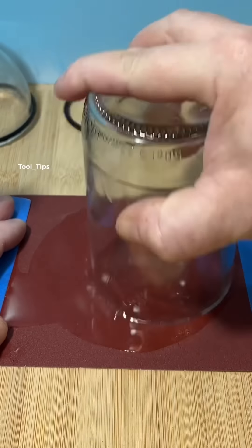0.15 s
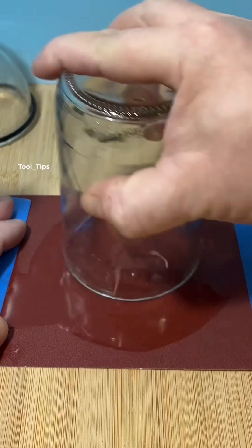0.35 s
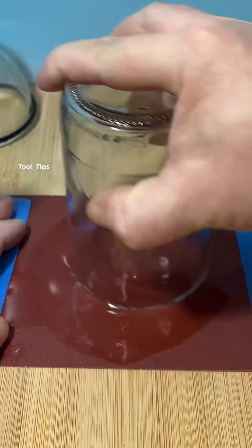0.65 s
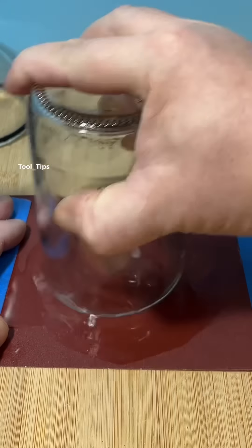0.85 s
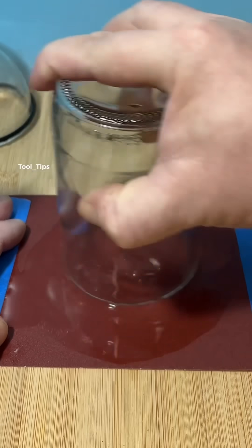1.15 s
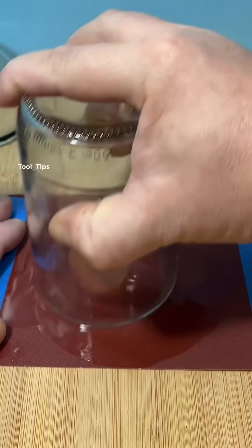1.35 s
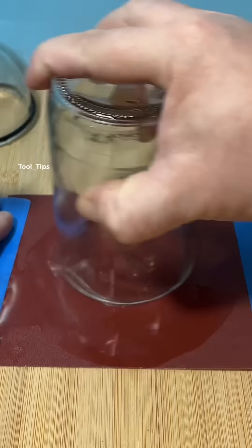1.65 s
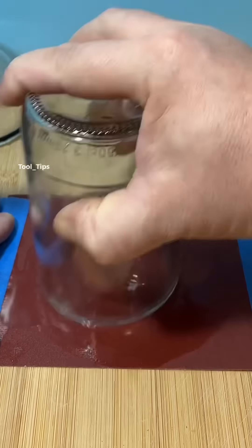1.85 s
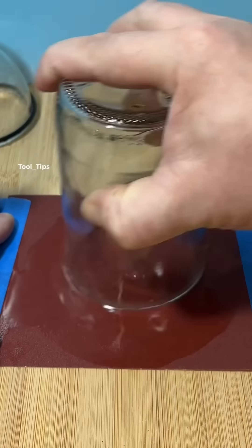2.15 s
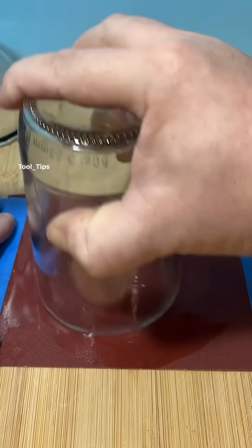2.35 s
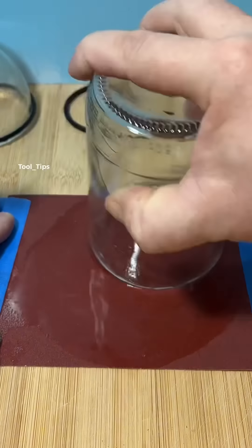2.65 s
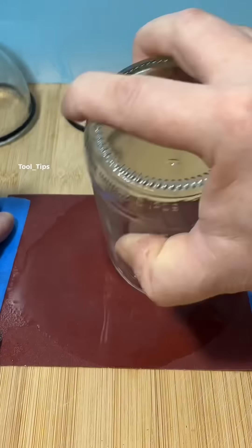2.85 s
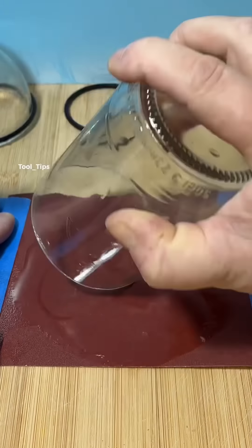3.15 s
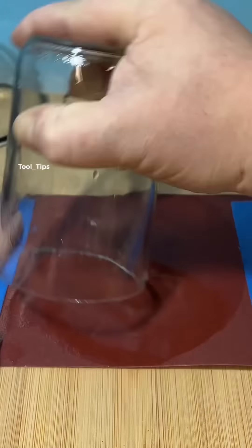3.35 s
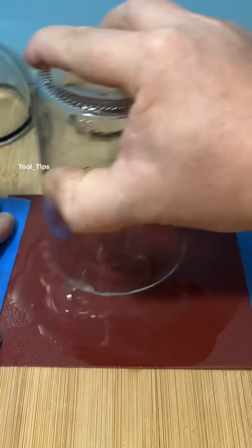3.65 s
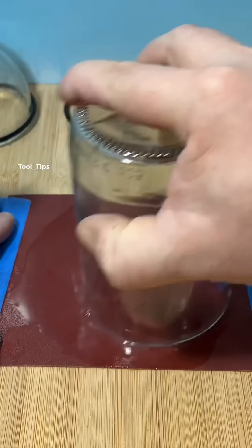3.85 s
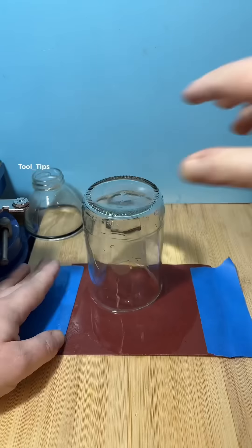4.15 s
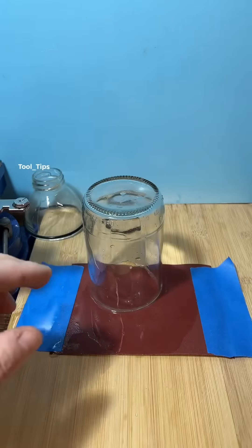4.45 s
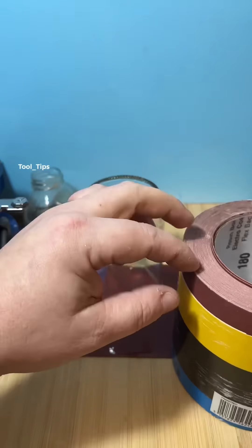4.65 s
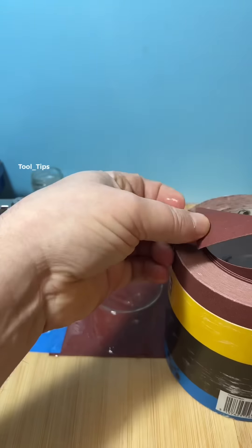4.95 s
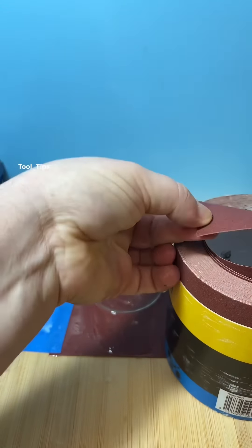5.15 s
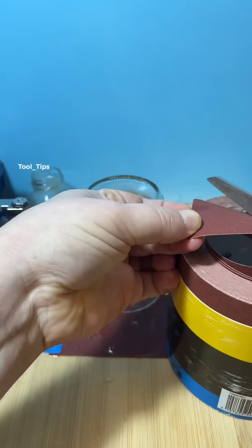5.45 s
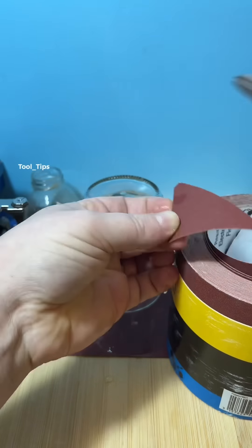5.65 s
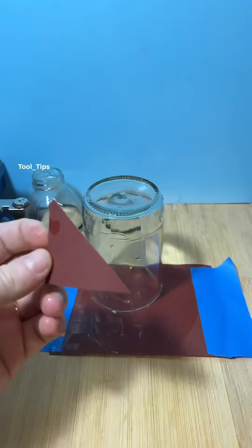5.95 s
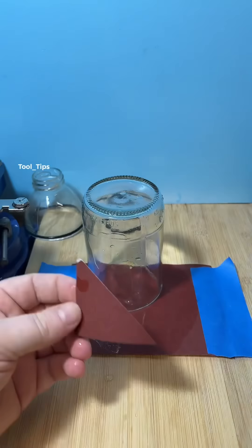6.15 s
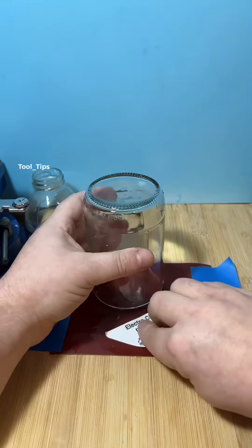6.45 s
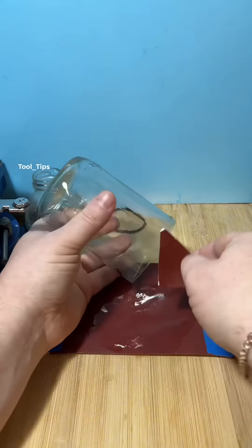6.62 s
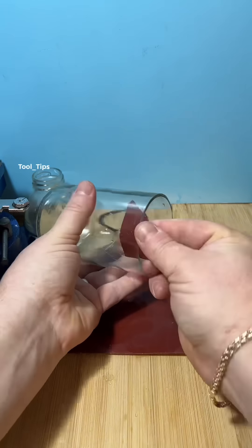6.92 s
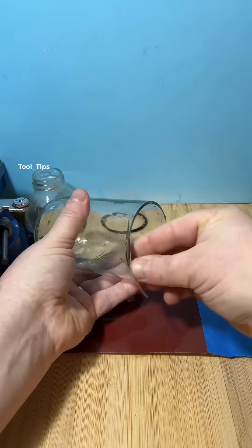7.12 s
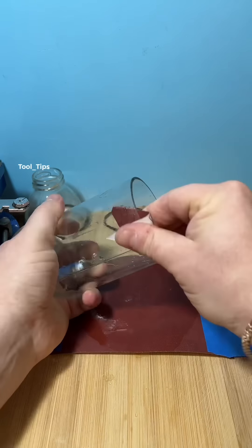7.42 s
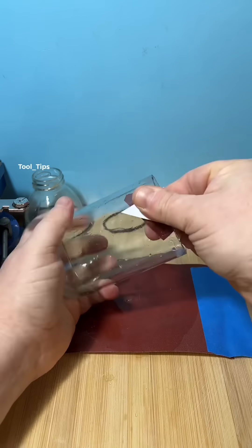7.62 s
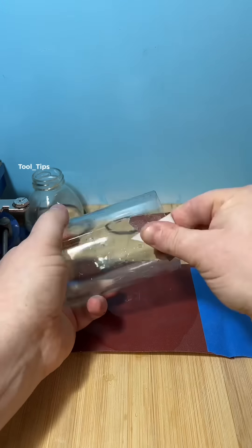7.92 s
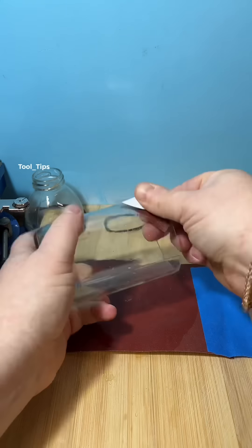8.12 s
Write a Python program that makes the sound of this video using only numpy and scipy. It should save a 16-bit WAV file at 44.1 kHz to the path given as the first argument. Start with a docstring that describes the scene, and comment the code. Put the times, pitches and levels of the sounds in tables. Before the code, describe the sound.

Close up on a wooden bench, an upturned glass jar is ground on abrasive paper in quick, pulsing circles, bright and gritty with a glassy ring. It tilts into longer stuttering scrapes, then knocks and grinds again before stopping. A clunk, paper rustles and a quick metallic scissor cut follow, then quiet, scratchy wiping of a paper scrap along the glass edge. Dry small room, faint hush.

```python
"""Glass ground on abrasive paper

An upturned glass is ground in quick circles on abrasive paper taped to a wooden bench, tilted, and ground again.
Hands then set down a roll, cut and handle a scrap of the paper, and wipe the glass's edge with it in a quiet room.
Grit is clumped, spiky noise; shaped by each contact, it drives resonances of rim, wall, edge and bench.
Knocks, cracks, rustles, blade slips and wiping strokes are timed bursts, over a faint tail and a room hush.
"""
import sys
import numpy as np
from scipy import signal
from scipy.fft import rfft, irfft, next_fast_len
from scipy.io import wavfile
from scipy.ndimage import map_coordinates

SR = 44100
rng = np.random.default_rng(int(sys.argv[2]) if len(sys.argv) > 2 else 0)


def generate_wav(sig):
    """Save sig (samples, or channels by samples) to the path in sys.argv[1] as 16-bit PCM at SR."""
    pcm = np.round(np.clip(np.atleast_2d(sig).T, -1, 1) * 32767).astype(np.int16)
    wavfile.write(sys.argv[1], SR, pcm)


N = 365148
T = np.arange(N) / SR
TOP_HZ = 15780  # upper band limit

# Steady rub. Each row: start in seconds, pressure in dB, fine hiss drive in dB, tilt of the glass 0-1.
RUB = [(0, -34.5, -32.5, 0), (0.8, -36, -32, 0), (1.7, -38, -33, 0), (2.5, -37.5, -33.5, 0),
       (2.6, -40, -38, 1), (2.97, -36, -34.5, 1), (3.11, -39.5, -39, 1), (3.4, -36.5, -31.5, 0.8),
       (3.49, -30, -35, 0.1), (3.53, -41, -34.5, 0.24), (3.95, -38, -35.5, 0.3), (4.05, -36.5, -43, 0.33),
       (4.07, -52, -45, 0.1), (4.095, -99, -89.5, 0.1)]
# Circles of the hand. Each row: time in seconds, push in dB.
CIRCLES = [(0.028, -27), (0.104, -29.5), (0.184, -25), (0.248, -30.5), (0.322, -27.5), (0.396, -32),
           (0.475, -29), (0.535, -24.5), (0.613, -27.5), (0.689, -27), (0.767, -25.5), (0.829, -27.5),
           (0.909, -28), (0.979, -29.5), (1.057, -28), (1.125, -26), (1.198, -25), (1.261, -26.5),
           (1.342, -32), (1.411, -28), (1.48, -28), (1.552, -29.5), (1.626, -26), (1.694, -31.5),
           (1.767, -23.5), (1.841, -26.5), (1.922, -25), (1.992, -27), (2.066, -26.5), (2.134, -30),
           (2.22, -25), (2.281, -29), (2.365, -27.5), (2.418, -26.5), (2.49, -29.5), (2.564, -26.5),
           (3.556, -29.5), (3.626, -31.5), (3.709, -30), (3.796, -31.5), (3.872, -32), (3.945, -37.5),
           (4.034, -33.5)]
# Long sweeps of the tilted rim. Each row: centre in seconds, half length in seconds, wall drag in dB, edge drive in dB.
SWEEPS = [(2.648, 0.038, -31.5, -33), (2.822, 0.049, -28.5, -27), (3.137, 0.045, -39.5, -41),
          (3.21, 0.056, -35, -26.5), (3.349, 0.027, -28.5, -34.5), (3.424, 0.023, -33, -35)]
# The tilted rim hops off the paper. Each row: start in seconds, length in seconds.
SKIPS = [(2.692, 0.0052), (2.767, 0.0042), (2.894, 0.0045), (2.912, 0.0097), (2.93, 0.011), (2.942, 0.011),
         (2.965, 0.0042), (2.981, 0.009), (2.999, 0.011), (3.029, 0.0033), (3.042, 0.0036), (3.057, 0.005),
         (3.065, 0.0039), (3.083, 0.0042), (3.265, 0.0078), (3.284, 0.0063), (3.301, 0.007), (3.323, 0.006),
         (3.334, 0.0091), (3.355, 0.0078), (3.46, 0.0036)]
# The rim catches and shakes the bench. Each row: time in seconds, peak drive in dB.
THUMPS = [(0.018, -38), (0.256, -39), (0.283, -37), (0.356, -34), (0.389, -40), (0.46, -39), (0.573, -32),
          (0.605, -37.5), (0.675, -42.5), (0.797, -33.5), (0.828, -43), (0.906, -45.5), (0.945, -33.5),
          (0.972, -43), (1.01, -36), (1.077, -39), (1.158, -36), (1.228, -32), (1.256, -40), (1.328, -39),
          (1.445, -28), (1.536, -50), (1.584, -43.5), (1.652, -35.5), (1.753, -38.5), (1.787, -35),
          (1.836, -38.5), (1.868, -33.5), (1.903, -43.5), (1.942, -34.5), (2.015, -41), (2.088, -31),
          (2.114, -42), (2.19, -40), (2.232, -34.5), (2.374, -38.5), (2.445, -35.5), (2.479, -40.5),
          (2.551, -41), (2.587, -41), (2.636, -42.5), (2.683, -38.5), (2.709, -34), (2.795, -42),
          (3.312, -37), (3.746, -42.5)]
# Low modes of the glass wall. Each row: frequency in Hz, width in Hz, gain in dB.
WALL_LOW = [(331.5, 75, -10), (752, 54, -4), (1472, 91, -12.5), (1765, 59, 0.5), (1977, 150, -1),
            (2470, 330, -7.5), (1400, 360, -8)]
# High modes of the wall. Each row: frequency in Hz, width in Hz, gain in dB.
WALL_HIGH = [(2768, 62, 1.5), (3150, 107, 7), (3520, 180, 1.5), (3922, 120, 1.5)]
# Top modes of the wall. Each row: frequency in Hz, width in Hz, gain in dB.
WALL_TOP = [(4530, 340, -5.5), (5733, 450, -4.5), (6590, 130, -13)]
# Ring of the rim. Each row: frequency in Hz, width in Hz, gain in dB.
RIM = [(7886, 99, 17), (7900, 600, -21.5)]
# Low, then high scrape band of the edge. Each row: frequency in Hz, width in Hz, gain in dB.
SIZZLE = [(8245, 950, -6.5), (9740, 1800, 0)]
# Colour of the fine grinding hiss. Each row: frequency in Hz, gain in dB.
HISS = [(5500, -17.5), (7200, -9), (8500, -7.5), (11000, -10.5), (12300, -13.5), (13800, -3.5),
        (15000, -13), (16000, -6)]
# Modes of the wooden bench. Each row: frequency in Hz, width in Hz, gain in dB.
BENCH = [(138.5, 10, -4), (328.3, 65, 11), (749, 32, 3.5), (1850, 370, -34)]
# Cracks of grit or edge. Each row: time in seconds, bright drive in dB, dull part over it in dB.
TICKS = [(0.135, -23, 3), (0.285, -27.5, 2), (0.573, -20.5, -0.5), (1.0093, -23.5, -4.5),
         (1.1337, -27, 2.5), (1.226, -20, -4.5), (1.443, -10, -7), (1.6511, -21, -9), (1.868, -24, -4.5),
         (1.7875, -22, -9.5), (2.0874, -18.5, -8.5), (2.3757, -21, 3), (2.445, -18, 2.5),
         (2.737, -30.5, -2), (3.313, -19, -10), (3.3402, -17.5, -8), (3.3497, -15, -6),
         (3.4672, -15.5, -5.5), (3.474, -20.5, 2.5), (3.579, -19, -7), (4.0208, -13.5, -15),
         (4.1248, -43.5, -6), (4.5418, -26.5, 7.5), (4.6465, -40, -9), (5.021, -44.5, 4.5),
         (5.1202, -52.5, -14), (5.5715, -29, 3), (5.5784, -28.5, 1.5), (5.9597, -44.5, -2.5),
         (6.5875, -51.5, 8), (6.683, -46.5, 4), (7.0678, -38, -24), (7.0808, -38, -7), (7.119, -16, -6),
         (7.385, -40.5, 3.5), (7.3928, -45, -5), (7.4987, -36, -19), (7.5956, -44.5, -19),
         (7.858, -45.5, -15.5)]
# Knocks. Each row: time in seconds, base level in dB, pop frequency in Hz.
KNOCKS = [(0.269, -18.5, 1110), (0.347, -30, 910), (1.443, -18, 750), (3.471, -17, 780), (3.573, -15, 1210),
          (3.658, -18.5, 1110), (3.891, -21.5, 800), (3.975, -19.5, 736), (4.541, -12.5, 770),
          (4.807, -20, 760), (6.062, -33, 667), (7.12, -42, 650), (7.523, -42.5, 1070), (7.585, -41, 794),
          (7.64, -40, 790), (7.702, -48, 394), (7.865, -38.5, 910), (7.992, -38.5, 1420),
          (8.115, -38, 1290)]
# Dull low pushes of the hands. Each row: time in seconds, drive in dB.
SHUDDERS = [(2.58, -59), (2.72, -44.5), (2.755, -70.5), (3.33, -63), (7.12, -68), (7.61, -64)]
# Rustles and slides. Each row: start in seconds, hold in seconds, base level in dB, weight on the bench 0-1.
HANDLING = [(4.113, 0.0072, -51, 0.94), (4.291, 0.048, -49.5, 0.1), (4.369, 0.04, -54, 0),
            (4.443, 0.011, -58, 0), (4.508, 0.018, -55.5, 0.15), (4.549, 0.015, -40.5, 0.48),
            (4.672, 0.0067, -53, 0.6), (4.69, 0.011, -38, 0.2), (4.703, 0.034, -29.5, 0.25),
            (4.751, 0.0097, -42.5, 0.63), (4.776, 0.022, -36.5, 0.39), (4.799, 0.031, -41.5, 0.58),
            (4.833, 0.031, -46, 0.5), (4.87, 0.0093, -45, 0.3), (4.901, 0.0029, -47.5, 0.75),
            (4.923, 0.014, -49.5, 0.45), (4.954, 0.015, -54, 0.57), (4.989, 0.013, -53, 0.35),
            (5.019, 0.0031, -45.5, 0.5), (5.056, 0.027, -47.5, 0.52), (5.116, 0.0069, -34, 0.46),
            (5.139, 0.013, -44.5, 0.47), (5.17, 0.015, -46.5, 0.47), (5.256, 0.003, -61, 1),
            (5.29, 0.014, -43, 0.56), (5.299, 0.018, -37.5, 0), (5.311, 0.052, -44.5, 0.68),
            (5.376, 0.045, -39.5, 0.58), (5.442, 0.0077, -45, 0.7), (5.463, 0.029, -29, 0.44),
            (5.537, 0.0078, -36.5, 0.3), (5.562, 0.0088, -28, 0.38), (5.646, 0.008, -57, 0.3),
            (5.717, 0.0054, -58.5, 1), (5.769, 0.0074, -43, 0), (5.779, 0.012, -59, 0.79),
            (5.868, 0.0083, -47, 0.6), (5.882, 0.013, -47.5, 0.4), (5.913, 0.013, -42.5, 0.15),
            (6.053, 0.02, -41, 0.5), (6.228, 0.012, -57.5, 0.55), (6.32, 0.0046, -43, 0.2),
            (6.334, 0.0091, -50, 0.52), (6.389, 0.07, -41, 0.23), (6.47, 0.0091, -41.5, 0.13),
            (6.484, 0.026, -37.5, 0.12), (6.511, 0.048, -30.5, 0.03), (6.575, 0.0049, -54.5, 0.66)]
# Body of the paper rustle. Each row: frequency in Hz, gain in dB.
PAPER = [(900, -35), (2400, 0), (3300, 5.5), (5000, 4.5), (6500, 5), (8200, 8), (9500, -16), (12000, -54)]
# Bright part of the rustle. Each row: frequency in Hz, gain in dB.
CRISP = [(6000, -34), (8800, -9), (9800, -2.5), (11000, -7.5), (13600, -1.5), (16000, -6.5)]
# Scissor blades slip through the grit. Each row: time in seconds, base level in dB.
SNIPS = [(5.3986, -17.5), (5.4053, -19), (5.4104, -23), (5.4135, -37.5), (5.4214, -23), (5.4286, -23.5),
         (5.4344, -19.5), (5.451, -12.5), (5.4582, -11), (5.4624, -20), (5.4633, -24), (5.4735, -12),
         (5.4792, -12.5), (5.488, -23.5)]
# Modes of the blades. Each row: frequency in Hz, width in Hz, gain in dB.
BLADES = [(1996, 250, 14), (5000, 220, 11.5), (8340, 670, 6), (12100, 500, -8.5), (6030, 5900, -17)]
# The scrap strokes the edge. Each row: start in seconds, hold in seconds, edge drive in dB.
WIPES = [(6.698, 0.0098, -63), (6.723, 0.024, -54.5), (6.785, 0.02, -48), (6.807, 0.053, -42.5),
         (6.874, 0.02, -40.5), (6.917, .036, -38.5), (6.965, .022, -40), (7.005, .017, -41),
         (7.042, .015, -56), (7.091, 0.011, -47), (7.124, 0.013, -57), (7.139, 0.02, -61),
         (7.167, .022, -47), (7.23, .022, -60.5), (7.276, .036, -43.5), (7.342, 0.014, -62),
         (7.39, .028, -38.5), (7.518, .022, -42), (7.624, 0.044, -42), (7.679, .01, -58),
         (7.715, .014, -57), (7.734, 0.011, -48), (7.762, .024, -40.5), (7.856, .012, -57),
         (7.881, 0.0155, -44), (7.917, 0.0057, -46.5), (7.994, 0.036, -41.5), (8.101, .012, -59),
         (8.119, .022, -45.5), (8.151, .026, -54.5), (8.196, 0.014, -59), (8.239, 0.031, -42)]
# Rim of the hand-damped glass. Each row: frequency in Hz, width in Hz, gain in dB.
HELD_RIM = [(5300, 1700, -13.5), (7846, 190, 12.5), (10450, 490, 2), (13900, 1300, 1.5), (15400, 920, -6)]
# Wall of the hand-damped glass. Each row: frequency in Hz, width in Hz, gain in dB.
HELD_WALL = [(1450, 1400, -9.5), (2860, 120, -2), (3340, 190, 7), (4430, 1100, -4.5)]
# Spectral shape of the room hush. Each row: frequency in Hz, relative density in dB.
ROOM = [(12, -36.5), (20, -8), (65, -9), (101, -11), (134, -12), (399, -15.5), (607, -16.5), (660, -17),
        (873, -20.5), (1910, -25), (16000, -37.5)]

RING_DB, SIZZLE_DB = -2.5, 0.5  # rim ring and edge sizzle over the pressure, glass flat
TILT_DRAG_DB, TILT_RING_DB, TILT_SIZZLE_DB = 3.5, -1.5, 2  # what a full tilt adds
TILT_TOP_DB = -3.5  # between sweeps a tilted rim drives the top wall modes less
HIGH_SHARE = 0.37  # power share of the steady sizzle drive in its high band
HIGH_LAG, LOW_LAG, RING_LAG = 0.5, 0.9, 2.5  # edge sings high, then low, then the rim rings: in half lengths
SWEEP_RING_DB = -7.5  # rim ring of a sweep over its edge drive
RING_GAP_S = 0.018  # the rim catches twice in each circle
DRAG_DB, STRAY_DB = -6.5, 1.39  # wall drive under a circle's push; how far the parts stray from the push
SKIP_DB = -22  # contact left in mid hop
THUMP_S = 0.0062  # half length of a bench shake
POP_DB, BLOW_DB = 2, 17.5  # pop and bench impulse over a knock's base level
LIGHT_DB, HEAVY_DB = (-31.5, -25, -2), (10, 4.5, -20)  # bench, 2 kHz and bright part: lightest, heaviest touch
WALL_DB, WALL_GROWS = -57, 0.65  # mean wall drive of a wipe; it swings less than the edge
HUSH_DB, TAIL_DB = -67.5, -19  # hush before its slow wobble; tail under the sources


def amp(db):
    """Gain of a dB value."""
    return 10 ** (np.asarray(db) / 20)


def unit(x):
    """x at rms 1."""
    return x / np.sqrt(np.mean(x ** 2) + 1e-20)


def filtered(x, response):
    """x times a complex response of frequency."""
    m = next_fast_len(N + SR // 2)
    return irfft(rfft(x, m) * response(np.fft.rfftfreq(m, 1 / SR)), m)[:N]


def modes(table):
    """Causal response of (Hz, width Hz, dB) resonances, summed with alternating sign."""
    def response(f):
        total = 0
        for k, (hz, width, db) in enumerate(table):
            damping = 1j * f * width
            total = total + (-1) ** k * amp(db) * damping / (hz * hz - f * f + damping)
        return total
    return response


def colour(points):
    """Gain curve through (Hz, dB) points on a log frequency axis."""
    hz, db = np.transpose(points)
    return lambda f: amp(np.interp(np.log(f + 1), np.log(hz), db))


def wobble(rate):
    """A smooth random curve with rate knots a second."""
    return map_coordinates(rng.standard_normal(int(N * rate / SR) + 4), [T * rate])


def grit(clump_db, grain_db):
    """Abrasive grains catching: noise swelling in slow clumps and fast spikes, at rms 1."""
    return unit(rng.standard_normal(N) * amp(clump_db * wobble(70) + grain_db * wobble(900)))


def humps(s, db, width):
    """Bell-shaped swells of pressure centred at s."""
    out = np.zeros(N)
    for at, level, w in np.broadcast(s, db, width):
        near = slice(max(round((at - 3 * w) * SR), 0), round((at + 3 * w) * SR))
        out[near] += amp(level) * np.exp(-((T[near] - at) / w) ** 2)
    return out


def strokes(s, length, db, rise, t60):
    """Contacts that build over a share of their length, hold, then fall 60 dB in t60 seconds."""
    out, t = np.zeros(N + SR), np.arange(SR // 3) / SR
    for at, hold, level in zip(s, length, db):
        shape = (1 - np.exp(-t / (rise * hold))) * amp(-60 * np.maximum(t - hold, 0) / t60)
        out[round(at * SR):][:len(t)] += amp(level) * shape
    return out[:N]


def rubbed(force, response):
    """A force through a body, scaled for rms near 1 from steady white force at rms 1."""
    hz = np.linspace(1, TOP_HZ, 4000)
    power = np.mean(np.abs(response(hz)) ** 2) * TOP_HZ / (SR / 2)
    return filtered(force, response) / np.sqrt(power)


def skip_contact():
    """Contact gain of the rim: full on the paper, nearly gone during each hop."""
    contact = np.ones(N)
    for start, length in SKIPS:
        near = slice(round(start * SR) - SR // 20, round(start * SR) + SR // 20)
        hop = np.exp(-((T[near] - start - length / 2) / (0.5 * length)) ** 4)
        contact[near] *= 1 - (1 - amp(SKIP_DB)) * hop
    return contact


def rim_ring(rub, stray):
    """Force of the grit on the rim: steady, with two catches a circle and a late swell in each sweep."""
    mid, half, _, edge_db = np.transpose(SWEEPS)
    at, push_db = np.transpose(CIRCLES)
    ring = rub(RING_DB, TILT_RING_DB) + humps(mid + RING_LAG * half, edge_db + SWEEP_RING_DB, half / 2)
    for side, own in zip((-1, 1), stray[[0, 2]]):
        ring += humps(at + side * RING_GAP_S / 2, push_db + 2 * STRAY_DB * own, width=0.0065)
    return grit(4.0, 3.5) * ring


def wall_drag(rub, stray, flutter):
    """Each circle drags the glass wall just after its push; three groups of modes answer."""
    mid, half, sweep_db, _ = np.transpose(SWEEPS)
    at, push_db = np.transpose(CIRCLES)
    sweep = humps(mid, sweep_db, half)
    drag = rub(0, TILT_DRAG_DB) + sweep
    top = rub(0, TILT_TOP_DB) + amp(1.0) * sweep
    # modes, steady and sweep drive, lag behind the push in seconds, gain in dB
    parts = ((WALL_LOW, drag, .024, -5), (WALL_HIGH, drag, .021, -3.5), (WALL_TOP, top, .023, -7))
    wall = np.zeros(N)
    for table, steady, lag, part_db in parts:
        circles = humps(at + lag, push_db + DRAG_DB + STRAY_DB * stray[1], width=0.016)
        force = grit(1.7, 3.8) * (steady + circles)
        wall += amp(part_db) * rubbed(force * flutter, modes(table))
    return wall


def edge_sizzle(rub, flutter):
    """The edge scrapes in two bands, the high one leading the low one in each sweep."""
    mid, half, _, edge_db = np.transpose(SWEEPS)
    sizzle = np.zeros(N)
    for band, share, lag in zip(SIZZLE, (1 - HIGH_SHARE, HIGH_SHARE), (LOW_LAG, HIGH_LAG)):
        force = np.sqrt(share) * rub(SIZZLE_DB, TILT_SIZZLE_DB)
        force += humps(mid + lag * half, edge_db, 0.43 * half)
        response = modes([band])
        sizzle += rubbed(grit(3.6, 1.3) * force * flutter, lambda hz: response(hz) ** 2)
    return sizzle


def bench_shake(rub):
    """Catches of the rim and a little of the steady rub shake the bench modes."""
    at, peak_db = np.transpose(THUMPS)
    shake = humps(at + THUMP_S / 2, peak_db, THUMP_S) + rub(-22, -3.5)
    return rubbed(grit(0.72, 1.4) * shake, modes(BENCH))


def grinding():
    """Pressure and tilt drive rim, wall, edge and bench; the fine hiss has its own drive."""
    s, *controls = np.transpose(RUB)
    pressure_db, hiss_db, tilt = [np.interp(T, s, c) for c in controls]
    grinding_on = T < s[-1]

    def rub(db, tilt_db):
        """Steady drive at an offset from the pressure, shifted by the tilt."""
        return amp(pressure_db + db + tilt_db * tilt) * grinding_on

    stray = rng.standard_normal((len(CIRCLES), 3)).T  # first catch, drag, second catch
    flutter = amp(wobble(55)) * skip_contact()  # shared by all but the bench
    glass = rubbed(rim_ring(rub, stray) * flutter, modes(RIM))
    glass += wall_drag(rub, stray, flutter) + edge_sizzle(rub, flutter)
    glass += rubbed(grit(1, 2.5) * amp(hiss_db) * grinding_on * flutter, colour(HISS))
    return glass + bench_shake(rub)


def ticks():
    """Sharp cracks with a dull part in the glass wall and a bright part at the rim."""
    dull, bright, t = np.zeros(N + SR), np.zeros(N + SR), np.arange(SR // 10) / SR
    for s, db, dull_db in TICKS:
        decay = 0.8 * amp(-60 * t / .005) + 0.15 * amp(-60 * t / 0.02)
        burst = rng.standard_normal((2, len(t))) * decay
        burst[:, 0] = 4  # the break itself
        dull[round(s * SR):][:len(t)] += amp(db + dull_db) * burst[0]
        bright[round(s * SR):][:len(t)] += amp(db) * burst[1]
    wall = rubbed(dull[:N], lambda hz: modes([(3500, 1800, 0)])(hz) ** 2)
    return wall + rubbed(bright[:N], modes([(9500, 11000, 8.0), (14200, 2000, -10)]))


def knocks():
    """A short decaying sine pop and noise scuff of the contact, and the bench ringing under it."""
    pops, blows, t = np.zeros(N + SR), np.zeros(N), np.arange(SR // 50) / SR
    for s, db, hz in KNOCKS:
        envelope = amp(db + POP_DB - 60 * t / 0.0089) * (1 - np.exp(-t / 0.00066))
        pops[round(s * SR):][:len(t)] += envelope * np.sin(2 * np.pi * hz * t)
        blows[round(s * SR)] = amp(db + BLOW_DB)
    s, db = np.transpose(KNOCKS)[:2]
    scuff = rng.standard_normal(N) * strokes(s, .004 + 0 * s, db - 12, rise=.2, t60=.025)
    return pops[:N] + filtered(blows, modes(BENCH)) + rubbed(scuff, modes([(1230, 1100, 0)]))


def shudders():
    """Slow pushes that the bench carries as a low rumble: noise swells in two low modes."""
    s, db = np.transpose(SHUDDERS)
    return rubbed(rng.standard_normal(N) * humps(s, db, width=0.03), modes([(35.6, 20, 5.5), (140, 23, 17)]))


def handling():
    """Paper and fingers rustle; heavier touches put more into the bench and less into the treble."""
    s, length, db, weight = np.transpose(HANDLING)
    bench_db, mid_db, bright_db = [light + (heavy - light) * weight
                                   for light, heavy in zip(LIGHT_DB, HEAVY_DB)]
    slips = amp(2.2 * wobble(220))  # every part of the sound catches and slips together

    def touch(part_db):
        """Fresh rustling grit under the touches."""
        return grit(2.2, 3) * slips * strokes(s, length, db + part_db, rise=0.17, t60=.05)

    sound = rubbed(touch(-7.0), colour(PAPER)) + rubbed(touch(bright_db), colour(CRISP))
    sound += rubbed(touch(mid_db), modes([(1820, 430, 0)]))
    return sound + rubbed(touch(bench_db), modes(BENCH + [(1030, 410, -4.0)]))


def crackle():
    """Faint ticks of paper and damp fingers: three short noise bursts scattered around each touch."""
    touches = np.array([row[0] for row in HANDLING + WIPES])
    offset, size = rng.random((2, 3, len(touches)))
    s = np.clip(touches + 0.07 * (offset - .5), 0, T[-1]).ravel()
    db = -64 - 2.2 * np.log(size.ravel() + 0.08)
    bursts = rng.standard_normal(N) * strokes(s, 0.0013 + 0 * s, db, rise=0.16, t60=0.012)
    return rubbed(bursts, modes([(2940, 1500, 5.5), (9700, 2100, 4.5), (14000, 6700, -0.5)]))


def scissors():
    """Every slip of the blades is a noise burst of a few ms into their modes."""
    s, db = np.transpose(SNIPS)
    slips = strokes(s, 0.0017 + 0 * s, db - 11.5, rise=.3, t60=0.0082)
    return rubbed(rng.standard_normal(N) * slips, modes(BLADES))


def wiping():
    """Short strokes of the scrap along the edge of the held glass drive its damped rim and wall."""
    s, length, db = np.transpose(WIPES)
    wall_db = WALL_DB + WALL_GROWS * (db - db.mean())
    slips = amp(1.5 * wobble(70))
    edge = grit(1.8, 2.7) * slips * strokes(s, length, db, rise=0.16, t60=0.034)
    wall = grit(0.49, 4.8) * slips * strokes(s, length, wall_db, rise=0.09, t60=0.052)

    def thin_wall(hz):
        """Wall modes with the bass rolled off."""
        return modes(HELD_WALL)(hz) * (1j * hz / (2500 + 1j * hz))

    return rubbed(edge, modes(HELD_RIM)) + rubbed(wall, thin_wall)


def room_tail(x):
    """A short tail from the nearby walls: convolution with decaying noise of unit energy."""
    t = np.arange(SR // 4) / SR
    tail = rng.standard_normal(len(t)) * amp(-60 * t / .12)
    return signal.fftconvolve(x, tail / np.linalg.norm(tail))[:N]


def room_hush():
    """The steady hush of the room: coloured noise with a slowly wobbling level."""
    noise = unit(filtered(rng.standard_normal(N), colour(ROOM)))
    return amp(HUSH_DB + 2.2 * wobble(12)) * noise


def scene():
    """All sources, their faint tail and the room hush."""
    near = grinding() + ticks() + knocks() + handling() + crackle() + scissors() + wiping()
    near = filtered(near, lambda hz: (1j * hz / (190 + 1j * hz)) ** 2)  # small objects radiate little bass
    return (near + amp(TAIL_DB) * room_tail(near) + shudders() + room_hush())[None]


def record(dry):
    """The recorder keeps nothing at or above its band limit."""
    return filtered(dry[0], lambda hz: hz < TOP_HZ)[None]


dry = scene()
out = record(dry)
generate_wav(out)
```